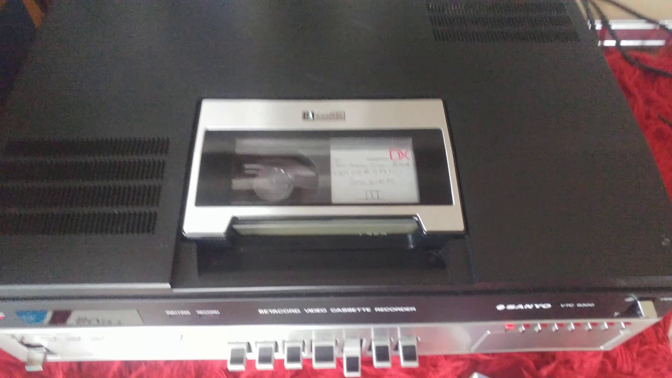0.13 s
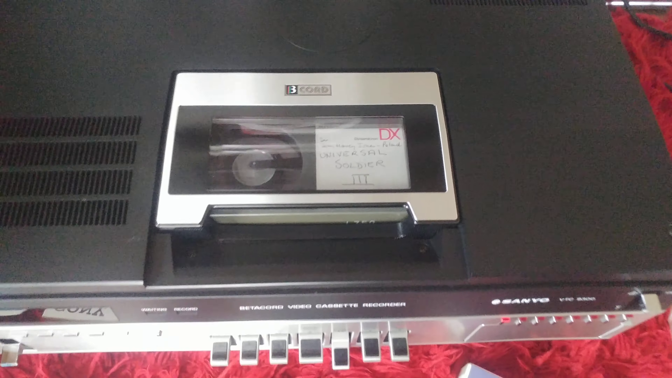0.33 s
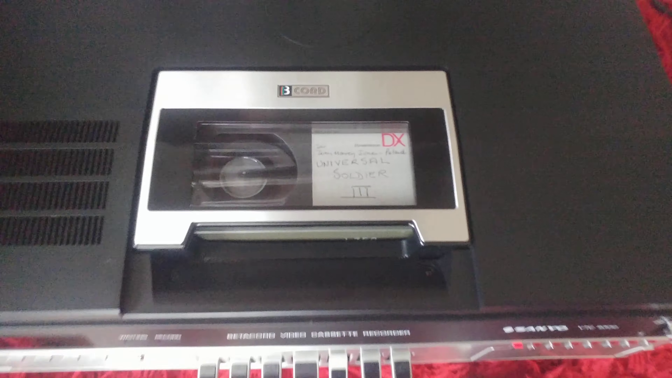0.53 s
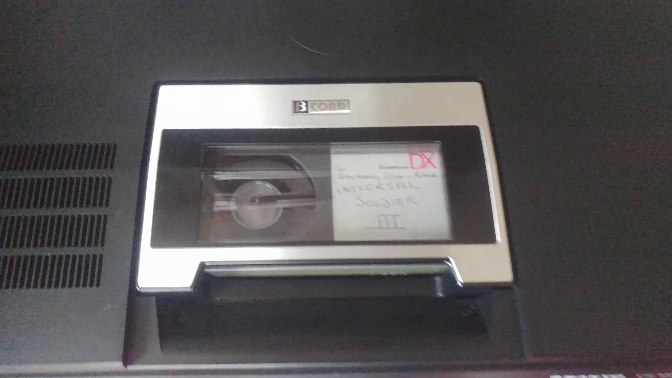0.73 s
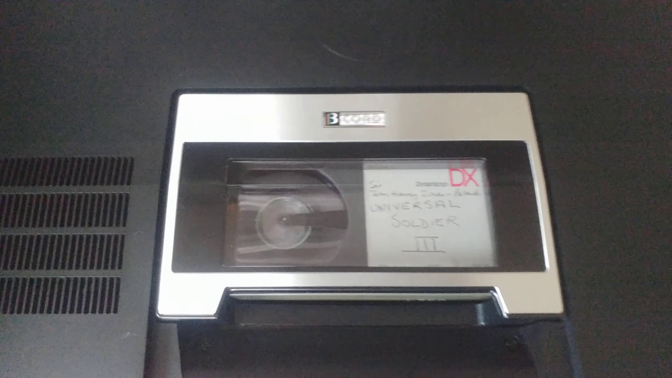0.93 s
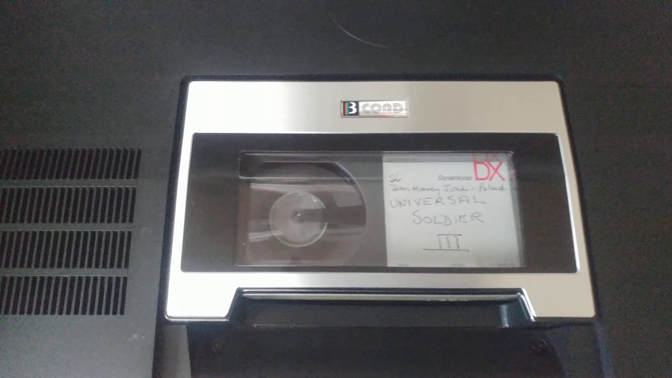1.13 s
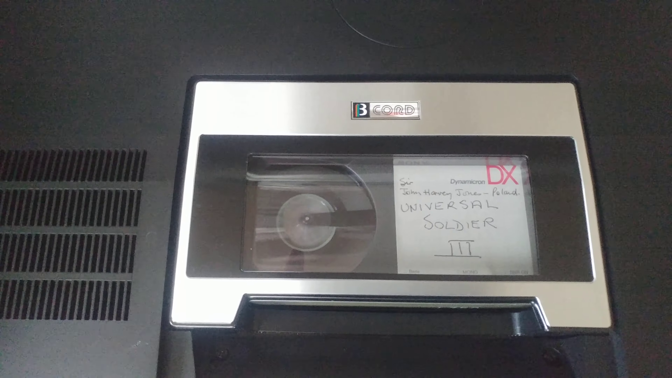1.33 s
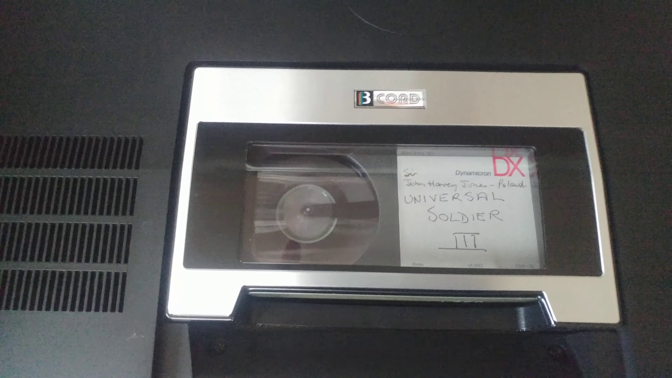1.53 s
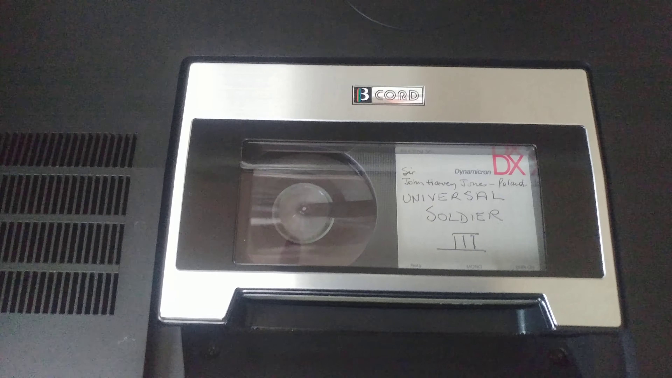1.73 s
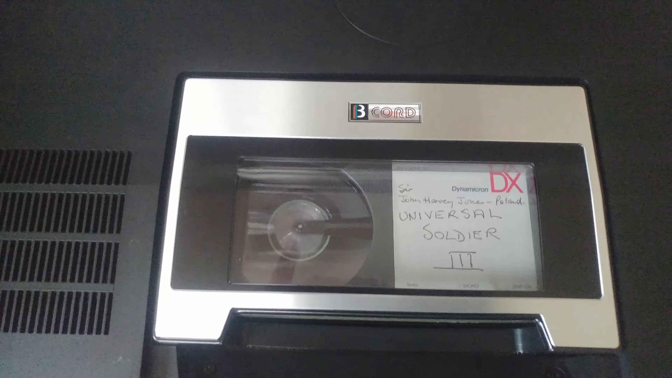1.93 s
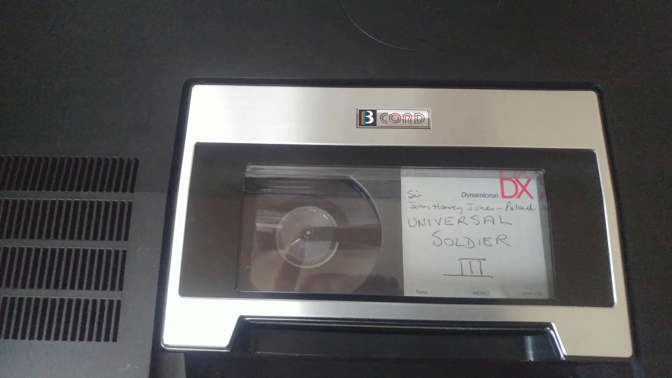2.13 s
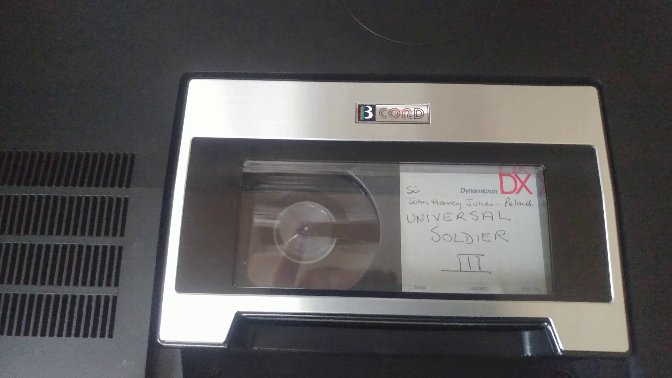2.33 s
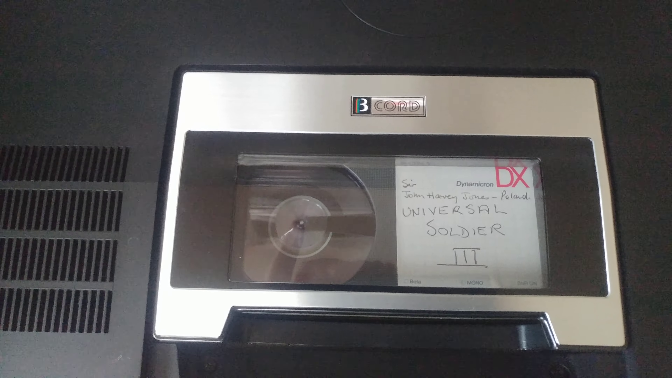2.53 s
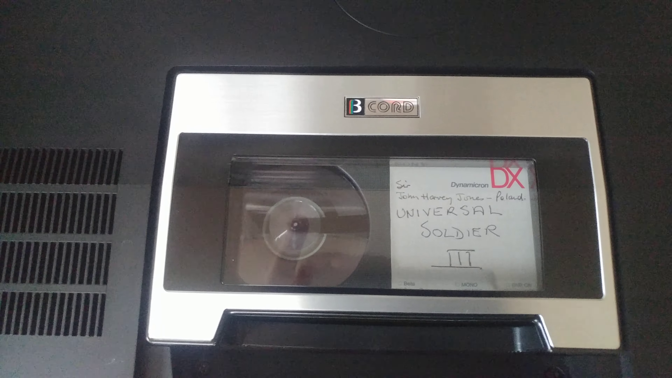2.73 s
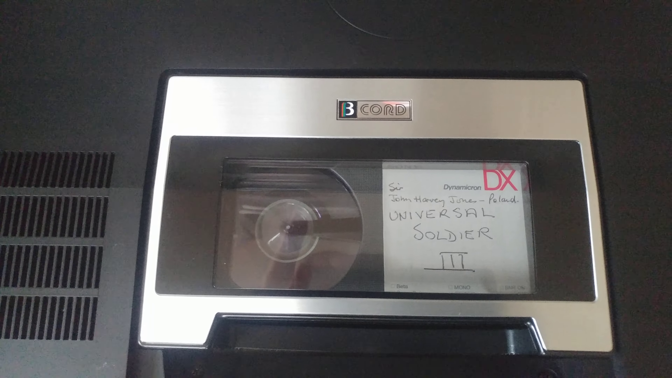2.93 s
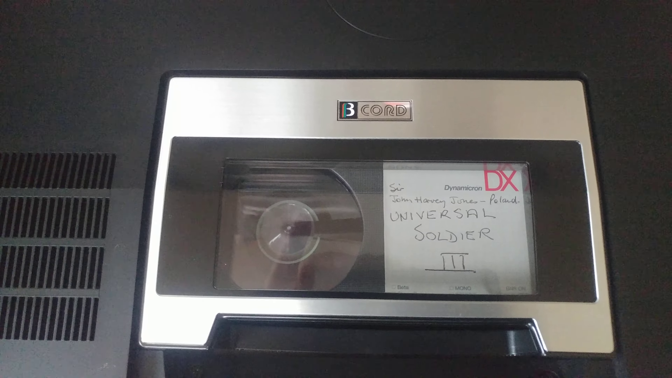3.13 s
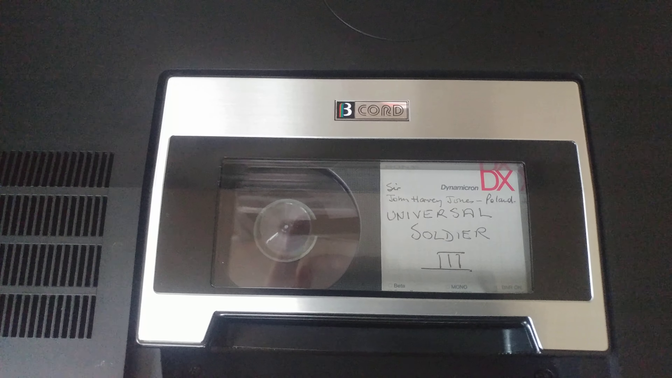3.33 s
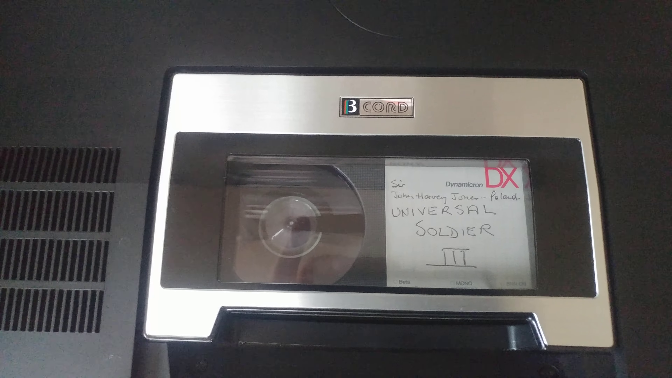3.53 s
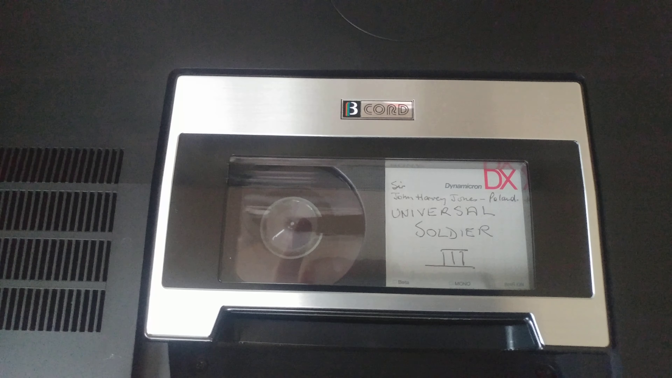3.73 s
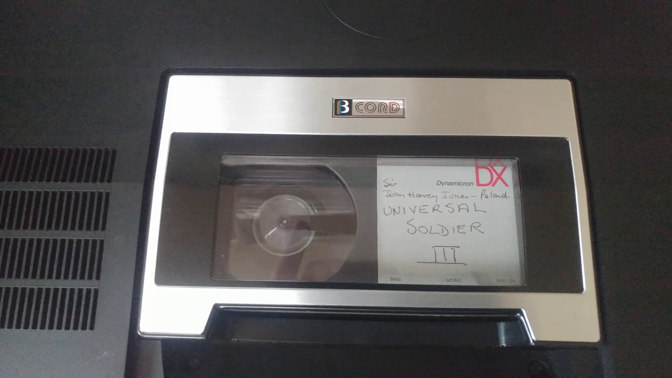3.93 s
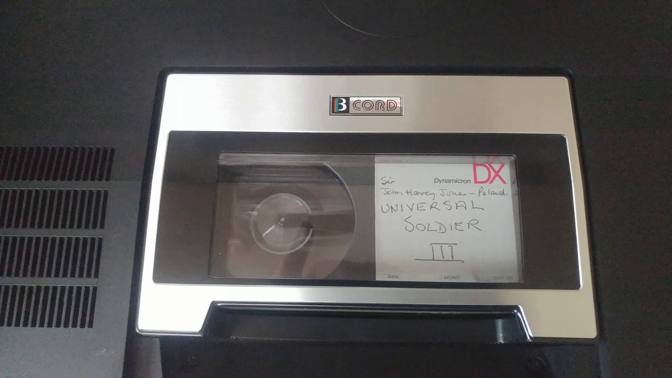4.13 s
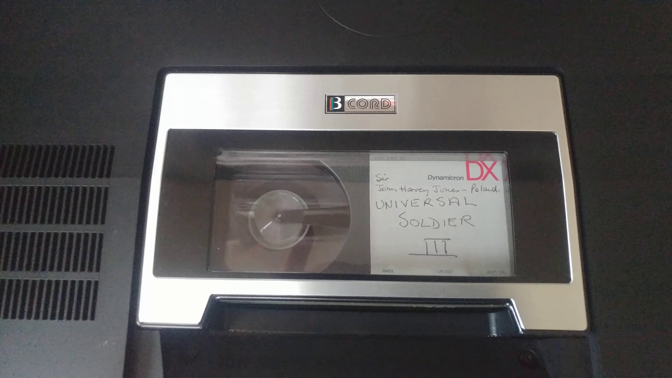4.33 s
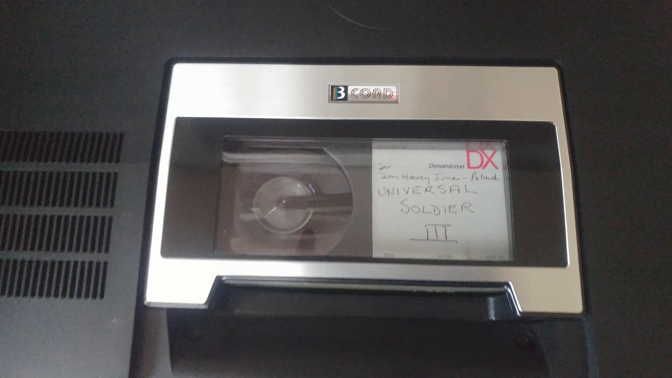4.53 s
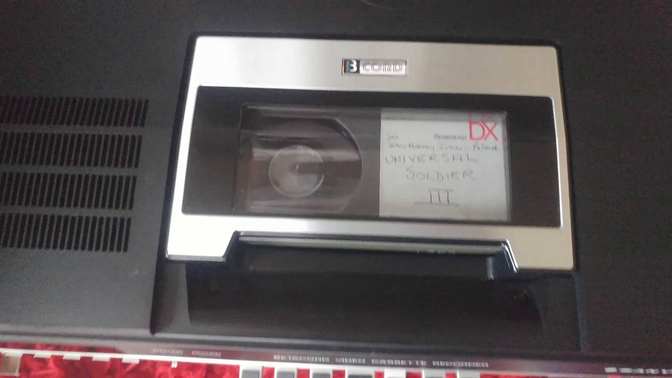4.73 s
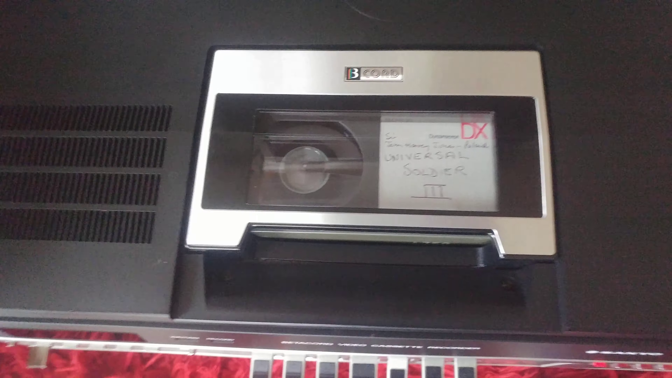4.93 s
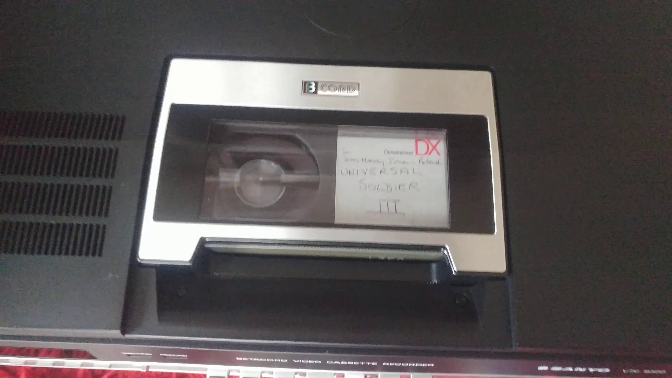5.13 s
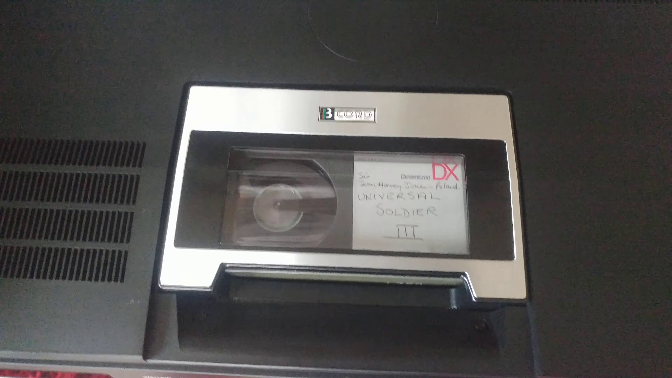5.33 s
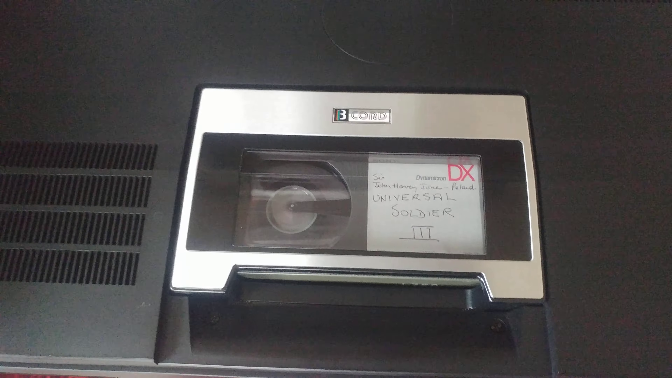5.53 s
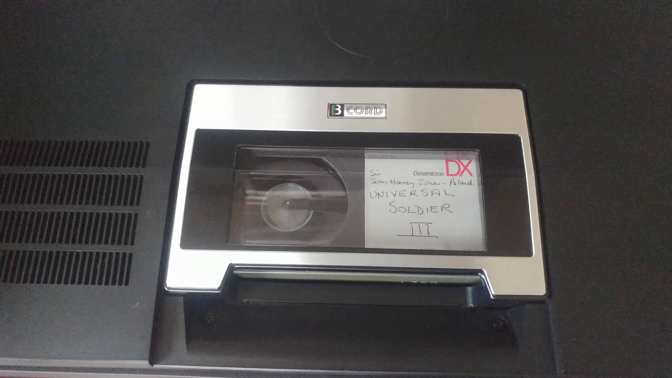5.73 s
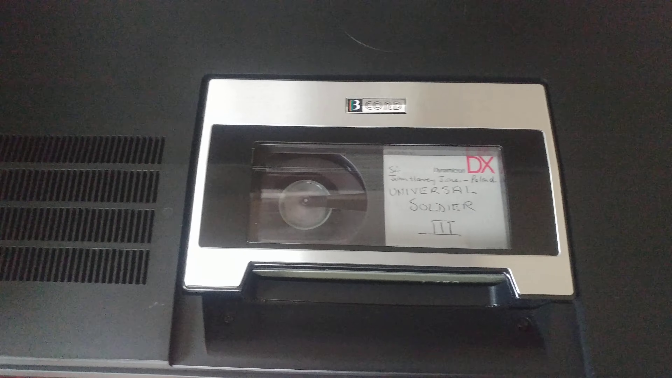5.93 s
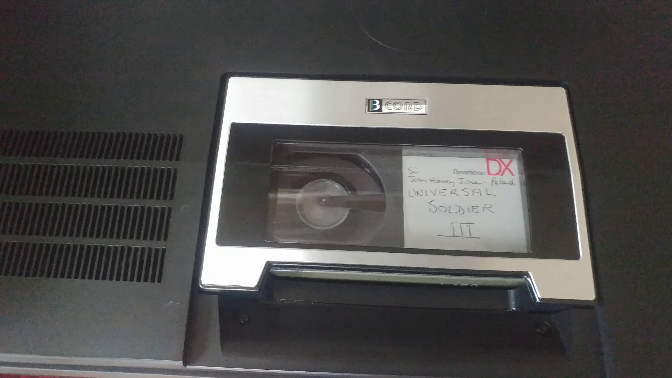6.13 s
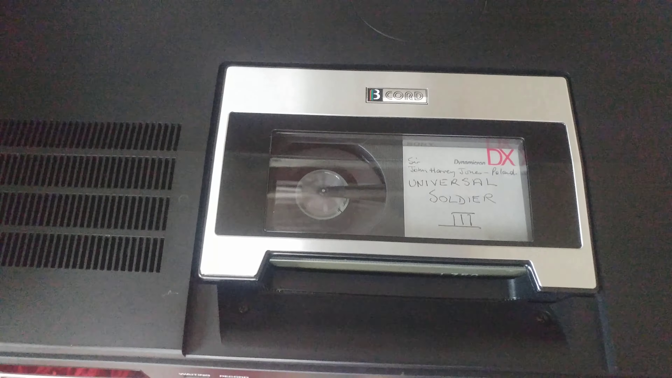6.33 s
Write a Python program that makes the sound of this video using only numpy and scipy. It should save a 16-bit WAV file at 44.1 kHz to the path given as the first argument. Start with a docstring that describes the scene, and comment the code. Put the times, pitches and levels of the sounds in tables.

```python
"""Knocks and a creak of the hand come first, over faint hiss and hum: noise bursts excite damped modes.
Then a video cassette deck fast-forwards: a motor shaft whines, strongest on its sixteenth order, and rattles the
chassis, hardest at two spots of each turn. A slow drum and two close drones beat below.
A two-port microphone moves nearer and away, which sets the levels; thin ticks come late.
At the very end the mechanism slams to a stop in a quick run of cracks and thuds."""
import sys
import numpy as np
from scipy import signal
from scipy.fft import rfft, irfft, next_fast_len
from scipy.io import wavfile
from scipy.ndimage import uniform_filter1d, map_coordinates

SR = 44100
rng = np.random.default_rng(int(sys.argv[2]) if len(sys.argv) > 2 else 0)


def unload_wav(signal):
    """Save mono or channel-first audio to the path in sys.argv[1] as 16-bit WAV at rate SR, clipped to [-1, 1]."""
    wavfile.write(
        sys.argv[1],
        SR,
        np.round(np.clip(np.atleast_2d(signal).T, -1, 1) * 32767).astype(np.int16),
    )


def invert_db(level):
    """Linear amplitude ratio for a level in decibels (20 dB per decade), elementwise."""
    return 10 ** (np.asarray(level, dtype=float) / 20)


N = 280784

# knocks of the hand: start_s, thump_db, creak_db, tick_db, t60_s
KNOCKS = [(.011, -33, -33, -30, 0.018), (.147, -29, -40, -41, 0.036), (0.296, -28, -36, -44, 0.03)]
# thump, creak and tick modes that the hand sets ringing, one list each: centre_hz, width_hz, level_db
GRIP_MODES = [
    [(385.2, 47, 0.5), (543, 62, -2), (656, 92, 0.5)],
    [(1070, 200, -9), (1370, 110, -2), (1640, 85, -6), (2180, 98, -12), (2580, 150, -25)],
    [(1940, 440, 4.5), (5600, 1200, -3), (12000, 9100, -21)],
]
# faint dry ticks: start_s, level_db, t60_s
TICKS = [(4.866, -41, .11), (5.42, -36, .016), (5.52, -42, .036)]
# modes of the dry ticks: centre_hz, width_hz, level_db
TICK_MODES = [(5500, 2900, 1), (12000, 9100, -12)]
# the slow head drum: multiple of its turn, level_db
DRUM_ORDERS = [(15, -59), (16, -60), (17, -64.5)]
# weak low tones: pitch_hz, level_db, unsteadiness_db
HUM_TONES = [(69, -65.5, 3.5), (96, -73.5, 4), (145, -68.5, -1.5)]
# layers that follow the microphone, rising as it comes near: time_s, whine_db, rattle_db
DRIVE = [(0, -66, -72), (.3, -50.5, -59), (.64, -48.5, -60.5), (.7, -40.5, -54.5), (1.29, -40.5, -48.5),
         (1.84, -42.5, -57), (1.91, -39.5, -48), (2.5, -41.5, -49), (2.6, -39.5, -48), (3.1, -42, -50.5),
         (3.3, -38.5, -48.5), (4.04, -40.5, -52), (4.9, -41, -54.5), (5.02, -46.5, -59.5),
         (6.37, -49.5, -57.5)]
# shaft orders: multiple of the turn, level_db
SHAFT_ORDERS = [(5, -34.5), (6, -21.5), (7, -19.5), (8, -16), (9, -20.5), (10, -22.5), (11, -13.5),
                (12, -12), (13, -12), (14, -6), (15, -8.5), (16, 2.5), (17, -12), (18, -15), (19, -29),
                (20, -18), (21, -23.5), (22, -30), (23, -25), (26, -19.5)]
# side orders against the main one: time_s, level_db
SIDE_ORDERS = [(0, -3), (.7, -3), (1.8, -0.5), (2, 1.5), (4.9, 0), (5.1, 3.5)]
# random swelling of the main order: time_s, depth_db
SWELL = [(1.8, 2.2), (2, .8)]
# chassis and cassette resonances heard near: centre_hz, width_hz, level_db
NEAR_MODES = [(1760, 59, -7.5), (2340, 15, -4.5), (2652, 61, -11), (3295, 44, -2.5), (4010, 29, -6),
              (5440, 69, -13.5), (6350, 7.3, 1.5), (6430, 69, 3), (7507, 113, 5), (8415, 73, -2),
              (8500, 72, -8.5), (9580, 20, -36.5), (10050, 120, -17), (10300, 120, -18), (11000, 65, -7)]
# the same parts heard from farther and lower: centre_hz, width_hz, level_db
FAR_MODES = [(2135, 21, -1), (2670, 48, -1), (3202, 77, -1), (3480, 17, 2.5), (4130, 23, 0.5),
             (6610, 69, 0), (7260, 99, 2.5), (7880, 19, -16), (9180, 54, -31), (9550, 114, -8.5),
             (9860, 230, -14), (11050, 260, -11)]
# spectrum of the whir: frequency_hz, density_db (per Hz)
WHIR_SPECTRUM = [(25, -49), (40, -25), (60, -16.5), (134, -22.5), (200, -15.5), (358, -22.5), (538, -12.5),
                 (871, -13), (1050, -6.5), (1280, -26), (1900, -31), (3000, -43.5)]
# course of the whir: time_s, level_db
WHIR_LEVEL = [(0, -49), (1.2, -50), (2.5, -47), (6.37, -47)]
# spectrum of the hiss: frequency_hz, density_db (per Hz)
HISS_SPECTRUM = [(760, -42), (1300, -1.5), (1780, -20), (1970, -13.5), (3230, -6.5), (4750, -14),
                 (7290, -4.5), (8090, -11), (9870, -13.5), (15800, -32)]
# imbalance of the two ports: frequency_hz, left_minus_right_db
PORT_BALANCE = [(60, 11), (99, -7), (160, 2), (270, 3), (450, 1), (740, 2.5), (1220, 5.5), (2010, 6.5),
                (3330, 4.5), (5500, -2), (9080, 7), (15000, 11.5)]
# coherence of the two ports: frequency_hz, common share (0 to 1)
PORT_COHERENCE = [(100, 1), (700, 0.78), (1100, 0.56), (2000, 0.96), (7000, 1), (11000, 0.44), (15000, .2)]
# contacts of the stopping mechanism: start_s, crack_db, thud_db
STOP_CONTACTS = [(6.3412, -24, -44), (6.344, -16.5, -41), (6.3476, -7.5, -8.5), (6.351, -13.5, -7),
                 (6.355, -16.5, -27), (6.360, -14.5, -5.5), (6.364, -32, -6)]
# colour of the cracks: frequency_hz, density_db (per Hz)
CRACK_SPECTRUM = [(470, -15), (800, -2), (1850, -9.5), (2970, -5.5), (3710, -13), (6930, -2.5), (9240, -17),
                  (11400, -13.5), (15800, -36)]
# modes of the case and of the jolt at the stop: centre_hz, width_hz, level_db
THUD_MODES = [(303, 44, -13), (587, 22, 12.5), (970, 750, -8)]
JOLT_MODES = [(89, 48, -2.5)]

# the grip creaks in a run of six slips whose thump fades from slip to slip
CREAK_S, SLIP_GAP_S, SLIP_T60_S, LAST_T60_S = .313, .0098, 0.041, 0.27
SLIP_THUMP_DB, THUMP_FADES_DB = -29, 2.2
SLIP_CREAK_DB, SLIP_TICK_DB, EDGE_SLIPS_DB = -33, -48, -8  # the first and last slip creak less
STRIKE = 3.4  # first sample of a contact, as a multiple of the noise rms before decay
# a second drone creeps up to the first from below, so that their beat slows to LAST_BEAT_HZ
DRONE_HZ, DRONE_DB = 50.8, -62.5
SECOND_DB, GROWS_DB_PER_S = -69.5, 1.88
BEAT_HZ, SLOWS_HZ_PER_S, LAST_BEAT_HZ, IN_STEP_S = 4.4, .7, 1.3, .86
DRUM_HZ, DRUM_IN_STEP_S = 12.497, .017
SHAFT_HZ, IDLER_HZ = 67.2, 5.15  # mean turns per second, the idler's before its phase wander
SPEED_PULL = .0047  # share of the shaft speed, per term of the idler pattern
NEAR_DB, FAR_DB = -46.5, -60.5  # rattle levels at which only the near or only the far modes are heard
HISS_DB, HISS_FOLLOWS = -52.5, 0.17  # settled level with the rattle at NEAR_DB; dB per dB of rattle
HISS_START_DB, HISS_RISE_S = -3, 0.38  # the hiss comes up as the microphone first approaches
LAG_S = .00011  # sound from the deck reaches the right port this much later


def unit(x):
    """Normalisation: the signal is scaled to rms 1."""
    return x / np.sqrt(np.mean(x ** 2) + 1e-20)


def along(points, hz):
    """Interpolation of (frequency, value) points on a logarithmic frequency axis."""
    f, v = np.transpose(points)
    return np.interp(np.log(hz + 1), np.log(f + 1), v)


def over_time(points):
    """Interpolation of (time, values..) points: one curve per value column."""
    time_s, *columns = np.transpose(points)
    return [np.interp(np.arange(N) / SR, time_s, column) for column in columns]


def wobble(rate):
    """Slow random modulation: Gaussian knots, rate of them a second, joined by straight lines."""
    knots = rng.standard_normal(int(N * rate / SR) + 4)
    return map_coordinates(knots, [np.arange(N) * rate / SR], order=1)


def filtered(x, response):
    """Linear filtering: the spectrum is multiplied by a complex response of frequency."""
    m = next_fast_len(N + 8192)
    return irfft(rfft(x, m) * response(np.fft.rfftfreq(m, 1 / SR)), m)[..., :N]


def coloured(spectrum):
    """Spectral shaping: white noise takes on a spectrum, at rms 1."""
    return unit(filtered(rng.standard_normal(N), lambda hz: invert_db(along(spectrum, hz))))


def resonances(modes):
    """Modal superposition: damped second-order resonators in parallel, with alternating signs."""
    def response(f):
        total = 0
        for k, (centre, width, db) in enumerate(modes):
            mode = 1j * f * width / (centre * centre - f * f + 1j * f * width)
            total = total + (-1) ** k * invert_db(db) * mode
        return total
    return response


def ports(a, b, lag_s):
    """Partial coherence: both ports hear a, b sets the right one apart; it lags, and reflections turn its treble."""
    knots = rng.standard_normal(64)

    def turn(hz):
        return np.arccos(np.clip(along(PORT_COHERENCE, hz), 0, 1))

    def phase(hz):
        # in the treble up to a quarter cycle ahead or behind, from band to band
        scattered = np.pi / 2 * np.tanh(8 * np.interp(hz / 450, np.arange(64), knots))
        return np.where(hz < 1500, 2 * np.pi * hz * lag_s, scattered)

    def mixing(hz):
        return np.exp(-1j * phase(hz)) * [np.cos(turn(hz)), np.sin(turn(hz))]

    def balance(hz):
        return invert_db(along(PORT_BALANCE, hz) * np.array([[.5], [-.5]]))

    right = filtered(np.array([a, b]), mixing).sum(0)
    return filtered(np.array([a, right]), balance)


def bursts(rows, channels):
    """Impact excitation: each (s, levels dB.., t60 s) row is a sharp contact and a dying noise burst."""
    blows, t = np.zeros((channels, N)), np.arange(SR // 8) / SR
    for s, *levels_db, t60 in rows:
        envelope = invert_db(-60 * t / t60) * (1 - np.exp(-t / 0.00042))
        burst = envelope * rng.standard_normal((channels, len(t))) + STRIKE * (t == 0)
        blows[:, round(s * SR):][:, :len(t)] += invert_db(np.array(levels_db)[:, None]) * burst
    return blows


def hand():
    """Stick-slip and impact: knocks and creak slips ring three mode groups of the grip; late ticks are thin."""
    slips = []
    for k in range(6):
        thump_db = SLIP_THUMP_DB - THUMP_FADES_DB * k
        creak_db = SLIP_CREAK_DB + EDGE_SLIPS_DB * (k in (0, 5))
        t60 = LAST_T60_S if k == 5 else SLIP_T60_S
        slips.append((CREAK_S + SLIP_GAP_S * k, thump_db, creak_db, SLIP_TICK_DB, t60))
    blows = bursts(KNOCKS + slips, channels=3)
    thump, creak, tick = [filtered(blow, resonances(modes)) for blow, modes in zip(blows, GRIP_MODES)]
    late_ticks = filtered(bursts(TICKS, channels=1)[0], resonances(TICK_MODES))
    grip = invert_db(13.5) * (thump + creak) + tick + late_ticks
    return ports(grip, grip, lag_s=0)


def drone(t):
    """Beating: two close low tones reinforce and weaken each other in turn."""
    beats = np.cumsum(np.maximum(BEAT_HZ - SLOWS_HZ_PER_S * t, LAST_BEAT_HZ)) / SR
    steady = 2 * np.pi * DRONE_HZ * t + 0.45 * wobble(2.65)
    second = steady - 2 * np.pi * (beats - np.interp(IN_STEP_S, t, beats))
    return invert_db(DRONE_DB) * np.sin(steady) + invert_db(SECOND_DB + GROWS_DB_PER_S * t) * np.sin(second)


def hum():
    """Superposed tones: clean drum orders beat once a drum turn beside the drone and unsteady tones."""
    t = np.arange(N) / SR
    drum_angle = 2 * np.pi * DRUM_HZ * (t - DRUM_IN_STEP_S)
    drum = sum(invert_db(db) * np.cos(k * drum_angle) for k, db in DRUM_ORDERS)
    tones = 0
    for hz, db, waver_db in HUM_TONES:
        level = invert_db(db + waver_db * wobble(3.89))
        tones = tones + level * np.sin(2 * np.pi * hz * t + 0.45 * waver_db * wobble(4.3))
    return np.sqrt(2) * (drum + drone(t) + tones)  # table levels are rms


def whine(angle, beside_db, swell_db, smear, flutter_db):
    """Harmonic orders: 13-17 run nearly in step and bunch into one throb a turn; farther ones start at random."""
    total = 0
    for k, db in SHAFT_ORDERS:
        level_db = db + (swell_db if k == 16 else beside_db) + flutter_db * wobble(25)
        out_of_step = max(abs(k - 15) - 2, 0) * rng.normal()
        total = total + invert_db(level_db) * np.cos(k * angle + smear * wobble(13) + out_of_step)
    return total


def patches(x, depth_db):
    """Interference: reflections off lid and floor lift and sink narrow bands as the microphone drifts."""
    z = signal.stft(x, nperseg=1024)[2]
    field = rng.standard_normal(z.shape[-2:])
    field = uniform_filter1d(field, size=4, axis=0)  # over frequency
    field = uniform_filter1d(field, size=60, axis=1)  # over time
    return signal.istft(z * invert_db(depth_db * unit(field)), nperseg=1024)[1][..., :N]


def rattle(angle, far, depth_db):
    """Modulated excitation: loose parts chatter through chassis modes, hardest at two spots of each turn."""
    beat = np.cos(angle - 2.9) + 1.5 * np.cos(2 * angle - 5.8 + 0.54 * wobble(3))
    beat_db = depth_db * beat * (0.5 + 0.29 * wobble(3.92))
    level = invert_db(beat_db + 0.89 * wobble(500) + 0.81 * wobble(8))
    chatter = level * rng.standard_normal((2, N))
    near_ring, far_ring = [unit(filtered(chatter, resonances(modes))) for modes in (NEAR_MODES, FAR_MODES)]
    return patches(np.sqrt(1 - far) * near_ring + np.sqrt(far) * far_ring, depth_db=-1.5)


def shaft_angle():
    """Frequency modulation: an uneven idler pulls the shaft speed about in a repeating pattern."""
    idler = 2 * np.pi * IDLER_HZ * np.arange(N) / SR + 0.68 * wobble(2)
    pull = 0
    for k in (1, 2, 3, 4):
        pull = pull + (1 + 0.32 * wobble(2.3)) * np.sin(k * idler + rng.uniform(0, 2 * np.pi))
    speed_hz = SHAFT_HZ * (1 + SPEED_PULL * pull + 0.00049 * wobble(30.0))
    return 2 * np.pi * np.cumsum(speed_hz) / SR


def deck():
    """Common modulation: one shaft angle drives all layers; the microphone's place sets their levels."""
    whine_db, rattle_db = over_time(DRIVE)
    whir_db, beside_db, swell_db = [over_time(points)[0] for points in (WHIR_LEVEL, SIDE_ORDERS, SWELL)]
    far = np.clip((NEAR_DB - rattle_db) / (NEAR_DB - FAR_DB), 0, 1)
    hiss_db = HISS_DB + HISS_FOLLOWS * (rattle_db - NEAR_DB)
    hiss_db = hiss_db + HISS_START_DB * np.exp(-np.arange(N) / SR / HISS_RISE_S)
    angle = shaft_angle()
    throb = invert_db(0.4 * np.cos(angle))
    tone = invert_db(whine_db) * whine(angle, beside_db, swell_db * wobble(20), smear=.2, flutter_db=1.5)
    # two independent noises each for whir and hiss
    whir = np.array([invert_db(whir_db + 1.8 * wobble(11)) * throb * coloured(WHIR_SPECTRUM) for _ in range(2)])
    chatter = invert_db(rattle_db) * rattle(angle, far, depth_db=5.0)
    hiss_pair = np.array([coloured(HISS_SPECTRUM), coloured(HISS_SPECTRUM)])
    hiss = invert_db(hiss_db) * np.sqrt(throb) * patches(hiss_pair, depth_db=2.5)
    shared, apart = whir + hiss + chatter + [tone, 0 * tone]
    return ports(shared, apart, lag_s=LAG_S)


def stop():
    """Impulse response: levers slam in quick succession, cracks are bright noise, thuds ring the case."""
    crack, push, t = np.zeros(N + SR), np.zeros(N), np.arange(SR // 20) / SR
    for s, crack_db, thud_db in STOP_CONTACTS:
        crack[round(s * SR):][:len(t)] += invert_db(crack_db - 60 * t / 0.046) * (1 - np.exp(-t / 0.00083))
        push[round(s * SR)] = invert_db(thud_db + 29.5)
    metal = ports(coloured(CRACK_SPECTRUM), coloured(CRACK_SPECTRUM), lag_s=0)
    thud = filtered(push, resonances(THUD_MODES)) * invert_db([[-1.5], [1.5]])
    jolt = filtered(push, resonances(JOLT_MODES)) * invert_db([[4.5], [-7.5]])  # mostly at the left port
    return crack[:N] * metal + thud + jolt


def scene():
    """Superposition: the hand, the hum (a little louder at the left), the deck and the final stop add up."""
    return hand() + hum() * invert_db([[1.1], [-1.1]]) + deck() + stop()


def band_limit(x):
    """A steep low-pass at the top of the band."""
    return signal.sosfilt(signal.butter(12, 15800, fs=SR, output="sos"), x)


def record(dry):
    """Saturation: a smooth knee limits the peaks to full scale."""
    knee = 6  # higher is harder
    clipped = dry / (1 + np.abs(dry) ** knee) ** (1 / knee)
    return band_limit(clipped)


dry = scene()
out = record(dry)
unload_wav(out)
```